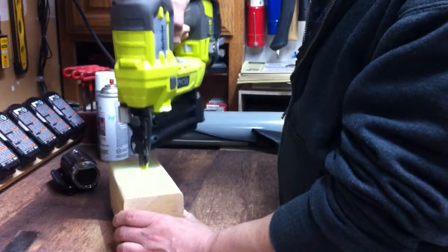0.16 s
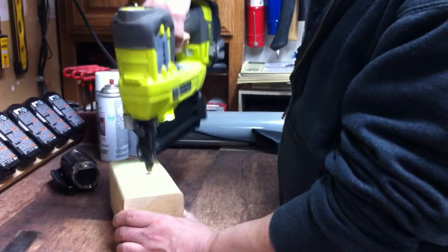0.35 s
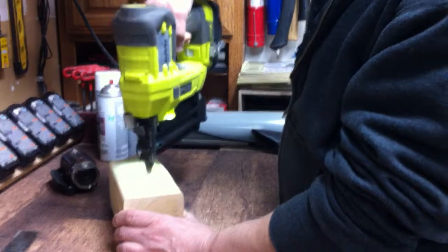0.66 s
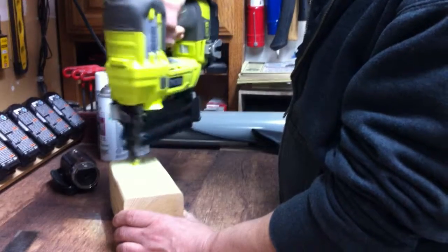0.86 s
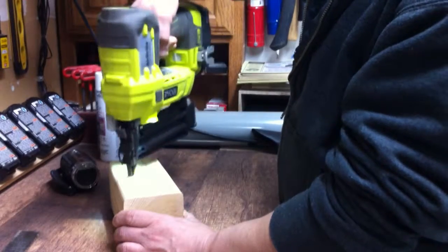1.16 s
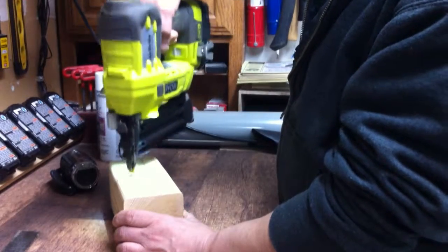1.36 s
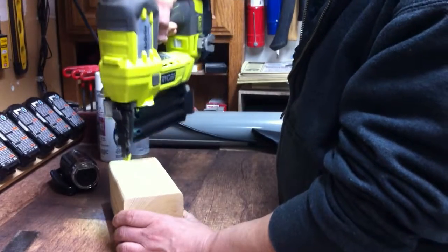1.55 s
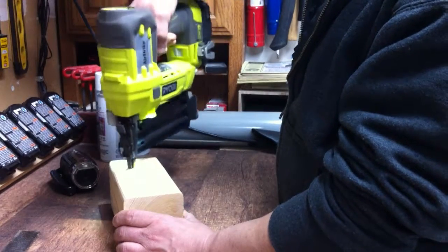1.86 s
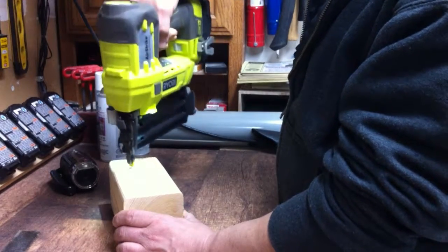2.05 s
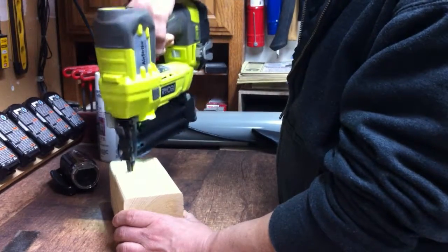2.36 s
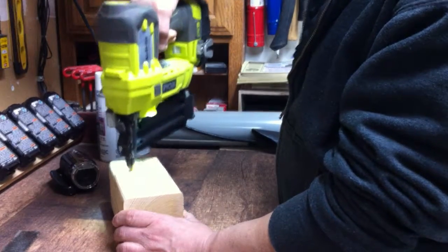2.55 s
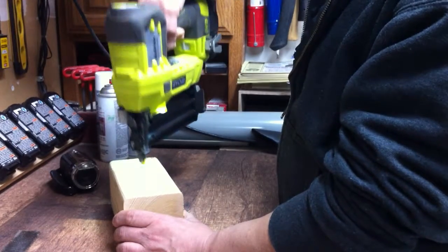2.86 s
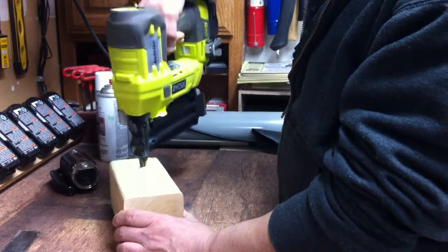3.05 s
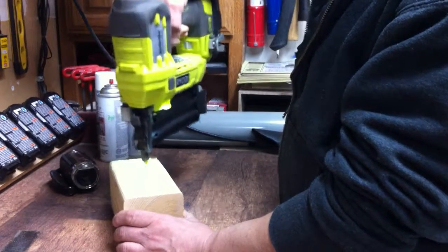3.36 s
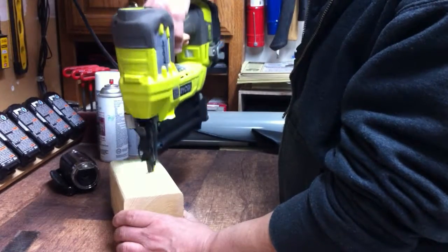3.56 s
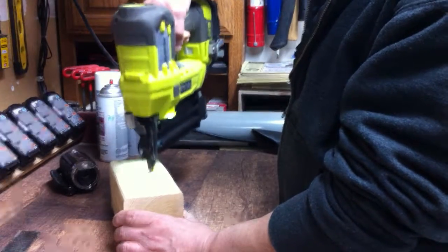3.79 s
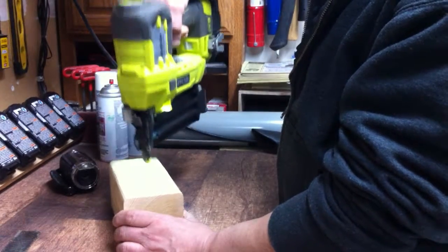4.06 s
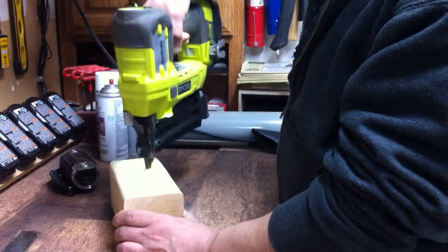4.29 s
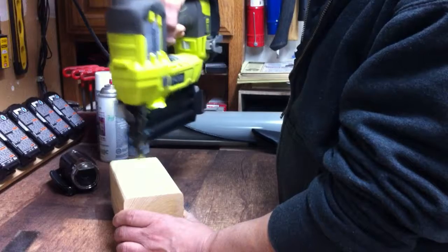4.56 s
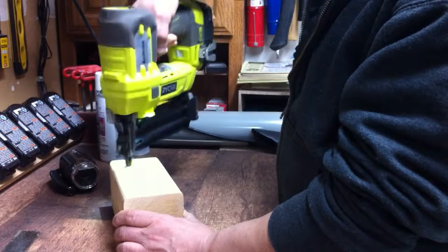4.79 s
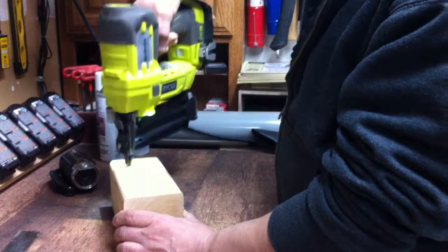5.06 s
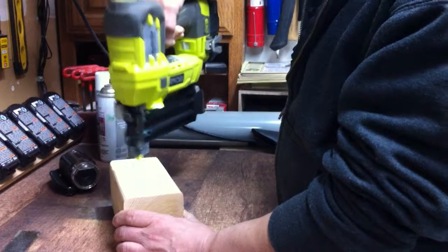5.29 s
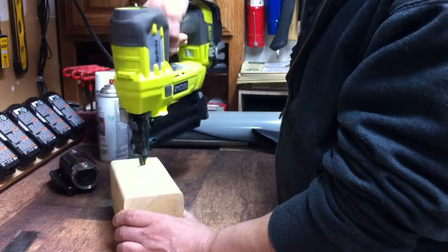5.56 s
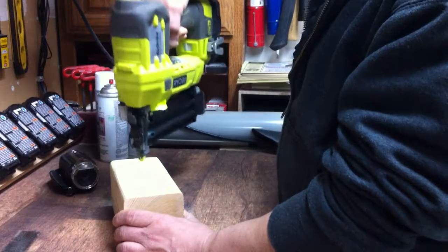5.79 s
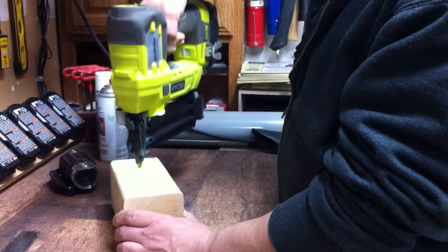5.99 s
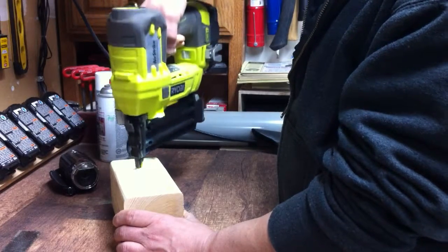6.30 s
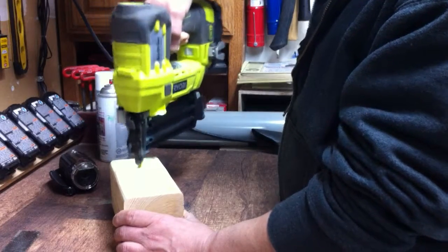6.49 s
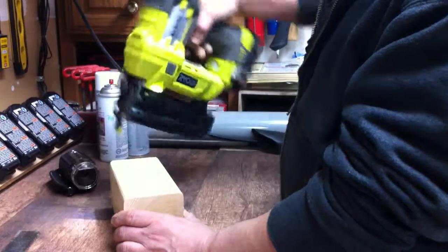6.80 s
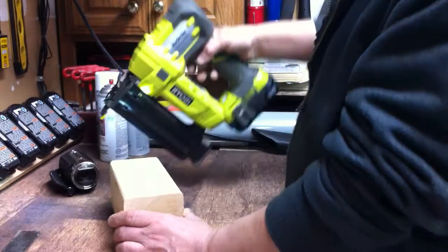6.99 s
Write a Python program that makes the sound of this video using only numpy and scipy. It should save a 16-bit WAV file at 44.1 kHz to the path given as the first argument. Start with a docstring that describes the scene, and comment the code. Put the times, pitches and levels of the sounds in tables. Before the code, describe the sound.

Close, dry and loud: repeated shots from an electric brad nailer on solid wood. A brief grinding gear whine climbs before every sharp bang; about a seventh of a second later comes a bright metal snap-back, then the motor stops abruptly. Small clicks and soft bumps of the tool on the block fill the gaps. The last shot follows a slightly longer pause, in a small room with very quiet air.

```python
"""A cordless brad nailer fires eleven nails into a wooden block on a workbench, in a small workshop.
Before each shot a geared motor winds up and sags against the compressed air; the driver slams the nail home,
about .14 s later it snaps back with a metallic ring, and .21 s after the shot the motor is braked.
Before most nails the nose clicks down on the wood. Hits are filtered noise and decaying modes.
Near surfaces answer within 21 ms, and the workshop's short tail and steady air noise lie behind."""
import sys
import numpy as np
from scipy import signal
from scipy.io import wavfile
from scipy.ndimage import uniform_filter1d

SR = 44100
rng = np.random.default_rng(int(sys.argv[2]) if len(sys.argv) > 2 else 0)


def transcribe(signal):
    """Save signal, clipped to [-1, 1], as a 16-bit WAV file at the path in sys.argv[1]."""
    frames = np.atleast_2d(signal).T
    limited = np.clip(frames, -1, 1)
    pcm = np.round(limited * 32767).astype(np.int16)
    wavfile.write(sys.argv[1], SR, pcm)


N = 314871  # samples in the scene
HIT_SIZE = 13230  # samples in one hit (0.3 s)


def amp(db):
    """Converts decibels to an amplitude factor."""
    return 10 ** (np.asarray(db) / 20)


def evened(x):
    """Scales a sound to rms 1."""
    return x / np.sqrt(np.mean(x ** 2) + 1e-20)


def as_hit(x):
    """Scales a hit to the energy of 20 ms at rms 1."""
    return x * np.sqrt(.02 * SR / np.sum(x ** 2))


def read(points, hz):
    """Interpolates a table of (hz, value) along log frequency."""
    f, value = np.transpose(points)
    return np.interp(np.log(hz + 1), np.log(f + 1), value)


def add(mix, s, sound):
    """Adds a sound at s seconds; whatever falls outside the scene is cut off."""
    start = round(s * SR)
    part = mix[max(start, 0):][:len(sound) + min(start, 0)]
    part += sound[max(-start, 0):][:len(part)]


def colour(x, spectrum):
    """Causal, minimum-phase filter with the given spectrum."""
    hz = abs(np.fft.fftfreq(4096, 1 / SR))
    log_gain = np.log(amp(read(spectrum, hz)))
    taps = np.fft.ifft(np.exp(np.conj(signal.hilbert(log_gain)))).real
    return signal.oaconvolve(x, taps[:len(taps) // 2])[:len(x)]


def chatter(rise, hold, t60, habit=0, alike=0):
    """Dense contact noise that swells, holds and dies; the share alike repeats the mechanism's habit."""
    t = np.arange(HIT_SIZE) / SR
    noise = np.sqrt(alike) * habit + np.sqrt(1 - alike) * rng.standard_normal(HIT_SIZE)
    decay = amp(-60 * np.maximum(t - hold, 0) / t60)
    return noise * (1 - np.exp(-t / rise)) * decay


def ring(modes, rise, detune, scatter_db):
    """Decaying modes with soft onset, each shifted a little in pitch and level at every blow."""
    t = np.arange(HIT_SIZE) / SR
    hz, db, t60 = np.transpose(modes)[:, :, None]
    shift, gain = rng.standard_normal((2, len(modes), 1))
    sign = (-1) ** np.arange(len(modes))[:, None]
    decay = amp(db + scatter_db * gain - 60 * t / t60)
    waves = sign * decay * np.sin(2 * np.pi * hz * (1 + detune * shift) * t)
    return as_hit(waves.sum(0) * (1 - np.exp(-t / rise)))


# the nails, one row each; the gains shape the tone around 700, 2800 and 7000 Hz:
# start_s, wood_db, crack_db, treble_db
NAIL_SHOTS = [(0.0636, -5, -3.5, -3.5), (0.7286, -6, -2, -2), (1.3584, -3, -2.5, -2.2),
              (2.032, -3.5, -2, 1), (2.6421, -2.5, -1, -0.2), (3.266, -1.7, -2, 1.5),
              (3.8618, -1.5, 1, -0.5), (4.4953, -2.5, -0.5, 1), (5.1231, -4, -2.6, -0.6),
              (5.7387, -4, 0, 0.5), (6.5009, -3, -1, 1)]
# spectrum of the crack: pitch_hz, level_db (per Hz)
CRACK_SPECTRUM = [(30, -32), (90, -28), (300, -9), (650, -7.5), (1100, -5), (1650, -6), (2200, 5),
                  (2900, -3.5), (4300, 2.5), (5600, -5), (6500, 0.5), (8500, -12), (10500, -14.5),
                  (15500, -10.5)]
# spectrum of the recoil's single push on the block: pitch_hz, level_db (per Hz)
RECOIL_SPECTRUM = [(30, -10), (90, -7), (300, 1.5), (700, -5.5), (2000, -21.5)]
# the wooden block on the bench: pitch_hz, level_db, t60_s
WOOD_BLOCK_MODES = [(177, -20, 0.13), (307, -10, 0.16), (420, -5, 0.1), (500.3, -7, 0.17),
                    (649, -15, 0.051), (712, -8, 0.14), (832, -6.5, 0.11), (930, -8, 0.036),
                    (980, -1, 0.11), (1054, 1, 0.085), (1180, 3, 0.11), (1315, 3.5, .08), (1525, -1, 0.041)]
# the nailer's nose and housing: pitch_hz, level_db, t60_s
NOSE_HOUSING_MODES = [(2034, -4, 0.074), (2170, -15, 0.043), (2566, -1.5, 0.063), (2497, -5.5, 0.053),
                      (3237, -3, 0.049), (3402, 4, 0.021), (3901, -1, 0.045), (4260, -1.5, 0.027),
                      (4940, -1, 0.02), (4940, 2, 0.047), (5232, 2, 0.035), (6400, -8, 0.012),
                      (6230, 4.5, 0.028), (6415, -11.5, 0.019), (7070, -4, 0.049), (7680, -8, 0.057),
                      (7840, -2.5, 0.033)]
# spectrum of spitting air and hissing brushes: pitch_hz, level_db (per Hz)
HISS_SPECTRUM = [(100, -30), (1500, -2), (5000, 0), (8000, 2), (10500, -0.5), (13000, 1.5), (15000, -2),
                 (16000, -5)]


def shots():
    """Air spits, the driver cracks the nail into the wood, and the recoiling tool settles and rattles twice."""
    out = np.zeros(N)
    for s, wood_db, crack_db, treble_db in NAIL_SHOTS:
        crack = as_hit(colour(chatter(rise=.00025, hold=.0045, t60=.05), CRACK_SPECTRUM))
        block = ring(WOOD_BLOCK_MODES, rise=.0016, detune=.006, scatter_db=1.8)
        housing = ring(NOSE_HOUSING_MODES, rise=.00062, detune=.006, scatter_db=3.0)
        push = as_hit(colour(signal.unit_impulse(HIT_SIZE), RECOIL_SPECTRUM))
        blow = amp(-18.0) * crack + amp(-33.0) * block + amp(-22.0) * housing + amp(-46.0) * push
        tone = [(700, wood_db), (2800, crack_db), (7000, treble_db)]
        add(out, s, colour(blow, tone))

        spit = as_hit(colour(chatter(rise=.0022, hold=.0025, t60=.014), HISS_SPECTRUM))
        add(out, s - .0034, amp(-31.5) * spit)

        late = rng.standard_normal(2)
        add(out, s + .0515 + .00087 * late[0], amp(-33.5) * rattle(t60=.055))
        add(out, s + .078 + .002 * late[1], amp(-43.5) * rattle(t60=.059))
    return out


# the driver snaps back against its stop: start_s, ring_db, clack_db
DRIVER_RETURNS = [(0.205, -24.5, -23), (0.8714, -20.5, -21.5), (1.498, -20.5, -22.5), (2.1737, -17, -21.5),
                  (2.7831, -18, -21), (3.4055, -17.5, -20), (3.999, -18, -20.5), (4.634, -17, -20.5),
                  (5.2644, -17.5, -22.5), (5.8774, -18, -20.5), (6.6437, -19, -21.5)]
# modes of the cylinder and driver: pitch_hz, level_db, t60_s
CYLINDER_DRIVER_MODES = [(303, -38.5, 0.12), (400.7, -22, 0.071), (432.4, -32, 0.087), (479, -42, 0.26),
                         (896, -33.5, .08), (1166, -29, 0.08), (1475, -19, 0.039), (1661, -9.5, 0.042),
                         (1765, -9.5, 0.05), (1877, -3, .052), (1995, 9.5, 0.031), (2150, -14, 0.087),
                         (2800, -20.5, 0.011), (3670, -29.5, 0.04)]
# spectrum of the clack on the stop: pitch_hz, level_db (per Hz)
CLACK_SPECTRUM = [(30, -28.5), (110, -33), (250, -37), (420, -2.5), (850, -19), (1250, -14.5), (1950, 5.5),
                  (2500, 1.5), (3500, 2.5), (5000, -4.5), (7300, -5.5), (8800, -12.5), (11000, -17),
                  (13500, -14.5), (16000, -14.5)]
RING_ROUGH = .28  # how much the driver's chatter on its stop roughens the ring (0-1)


def returns():
    """The driver scrapes up the cylinder, hits its stop and rings as it chatters there."""
    out = np.zeros(N)
    habit = rng.standard_normal(HIT_SIZE)  # the part of the clack that every return shares
    for s, ring_db, clack_db in DRIVER_RETURNS:
        scrape = as_hit(colour(chatter(rise=.0005, hold=.0035, t60=.015), GRIND_SPECTRUM))
        contact_noise = chatter(rise=.00016, hold=.00056, t60=.066, habit=habit, alike=.8)
        clack = as_hit(colour(contact_noise, CLACK_SPECTRUM))
        contact = 1 + RING_ROUGH * evened(uniform_filter1d(rng.standard_normal(HIT_SIZE), size=110))
        modes = ring(CYLINDER_DRIVER_MODES, rise=.0033, detune=.011, scatter_db=2.1)
        ringing = as_hit(contact * modes)
        add(out, s - .005, amp(clack_db) * amp(-13.0) * scrape)
        add(out, s, amp(clack_db) * clack)
        add(out, s + .00052, amp(ring_db) * ringing)
    return out


# the motor starts before each shot, runs on after it, and the brake slows it with this time constant (s)
WIND_UP_S, RUN_ON_S, BRAKE_S = .214, .21, .014
# time constant of the spin-up (s), share of the speed lost at full pressure
SPIN_UP_S, SAG = .036, .29
# widths of the pressure's bell-shaped rise before the shot and fall after it (s)
SQUEEZE_S, RELEASE_S = .032, .015


def motor_cycle():
    """Time from the shot (s), speed, air pressure and the piston's travel (all 0-1) through one cycle."""
    t = np.arange(-WIND_UP_S, RUN_ON_S + 5 * BRAKE_S, 1 / SR)
    pressure = np.exp(-(t / np.where(t < 0, SQUEEZE_S, RELEASE_S)) ** 2)
    spin_up = 1 - np.exp(-(t + WIND_UP_S) / SPIN_UP_S)
    brake = np.exp(-np.maximum(t - RUN_ON_S, 0) / BRAKE_S)
    pace = spin_up * (1 - SAG * pressure) * brake
    travel = np.minimum(1 + t / WIND_UP_S, 1)
    return t, pace, pressure, travel


# gear whine partials: multiple of the mesh rate, level_db
WHINE_PARTIALS = [(.99, -2), (1.37, -8), (2.02, 0), (3.03, -8)]
# spectrum of grinding and scraping metal: pitch_hz, level_db (per Hz)
GRIND_SPECTRUM = [(60, -37), (200, -25.5), (600, -14), (1100, -12), (1600, -1), (2400, -1), (3200, 0.5),
                  (4200, 4), (6000, -2), (7800, -4), (10000, -22.5), (16000, -32)]
# levels of grind, hiss and whine, before the speed scales them:
# stroke_end_db, gained_along_stroke_db, change_just_before_shot_db, running_on_db
GRIND_LEVELS = (-38, 17, -4.5, -45.5)
HISS_LEVELS = (-44.5, 12.5, -15, -51)
WHINE_LEVELS = (-46, 9.5, 15, -56.5)
MESH_HZ = 2950  # gear mesh rate at full speed, before each cycle's random deviation
BRAKE_DB, STRAIN_S = 2, .033  # the brake strains the gears: extra grind and its width in time
GRIP_T60 = .06  # extra damping by the hand's pressure (s)


def motor_level(levels, t, pressure, travel):
    """Level in dB that climbs along the stroke, swells or dips just before the shot and is steady after it."""
    top, climb, change, run_on = levels
    return np.where(t < 0, top - climb * (1 - travel) + change * pressure, run_on)


def motor():
    """Gears grind louder along the stroke and brush hiss climbs; the hiss level dips briefly just before the
    shot; the whine sags."""
    t, pace, pressure, travel = motor_cycle()
    grind_db = motor_level(GRIND_LEVELS, t, pressure, travel)
    grind_db = grind_db + BRAKE_DB * np.exp(-((t - RUN_ON_S) / STRAIN_S) ** 2)
    hiss_db = motor_level(HISS_LEVELS, t, pressure, travel)
    whine_db = motor_level(WHINE_LEVELS, t, pressure, travel)
    out = np.zeros(N)
    for s, *_ in NAIL_SHOTS:
        teeth, brushes, wobble, lumps = rng.standard_normal((4, SR))[:, :len(t)]
        speed = 1 + .014 * rng.standard_normal() + .026 * evened(uniform_filter1d(wobble, size=40))
        turns = np.cumsum(MESH_HZ * pace * speed) / SR

        # backlash breaks up each partial
        backlash = uniform_filter1d(rng.standard_normal((len(WHINE_PARTIALS), SR)), size=110)[:, :len(t)]
        whine = np.zeros(len(t))
        for (multiple, db), play in zip(WHINE_PARTIALS, backlash):
            whine += amp(db) * (1 + evened(play)) * np.sin(2 * np.pi * multiple * turns)

        teeth = teeth * amp(2.0 * evened(uniform_filter1d(lumps, size=60)))  # the teeth catch unevenly
        grind = amp(1.33) * evened(colour(teeth, GRIND_SPECTRUM))
        # they shake the housing and the block under it; pressed down, both ring shorter
        for modes, db in (NOSE_HOUSING_MODES, -7.5), (WOOD_BLOCK_MODES, -16.0):
            body = ring(modes, rise=.0012, detune=.027, scatter_db=3.5)
            body = body * amp(-60 * np.arange(HIT_SIZE) / SR / GRIP_T60)
            grind = grind + amp(db) * evened(signal.fftconvolve(teeth, body)[:len(t)])

        hiss = evened(colour(brushes, HISS_SPECTRUM))
        sound = amp(grind_db) * grind + amp(hiss_db) * hiss + amp(whine_db) * evened(whine)
        add(out, s - WIND_UP_S, pace * sound)
    return out


# levels of the starting jolt and of the gears' tick (dB), delay of the tick (s)
JOLT_DB, MESH_CLICK_DB, SLACK_S = -62, -56, .015


def motor_start():
    """The motor's torque jolts the tool, and the gears take up their slack with a tick."""
    out = np.zeros(N)
    for s, *_ in NAIL_SHOTS:
        add(out, s - WIND_UP_S, amp(JOLT_DB) * thud())
        add(out, s - WIND_UP_S + SLACK_S, amp(MESH_CLICK_DB) * rattle(t60=.05))
    return out


# the safety nose clicks down on the wood and slides in against its spring; the last two clicks are
# its release, with hardly any slide: start_s, click_db, treble_db (gain at 8 kHz), slide_db
NOSE_CONTACTS = [(0.478, -41.5, -3, -51), (1.104, -42, -7, -52), (1.7754, -44.5, -10.5, -57),
                 (2.3844, -42, -11.5, -55), (3.0018, -45.5, -4.5, -55.5), (3.5923, -43, -9, -59.5),
                 (4.2309, -42, -7.5, -52.5), (4.863, -43.5, -8.5, -55), (5.4604, -46, -12.5, -66),
                 (6.098, -47, -10, -72.5), (6.1245, -51.5, -5.5, -65)]
# the tool's weight bumps the block and the bench: start_s, level_db
WEIGHT_BUMPS = [(0.492, -51), (1.123, -46.5), (1.802, -53.5), (2.412, -53), (3.042, -61.5), (3.632, -64),
                (4.264, -59), (4.896, -56)]
# the bench top: pitch_hz, level_db, t60_s
BENCH_TOP_MODES = [(86, -5, 0.32), (121.2, 0, 0.18), (176, 0, 0.17)]


def handling():
    """The nose clicks and slides, at last clicks free; the tool's weight thuds through block and bench."""
    out = np.zeros(N)
    for s, click_db, treble_db, slide_db in NOSE_CONTACTS:
        click = colour(rattle(t60=.06), [(2500, .0044), (8000, treble_db)])
        add(out, s, amp(click_db) * click)
        slide = as_hit(colour(chatter(rise=.018, hold=.055, t60=.12), GRIND_SPECTRUM))
        add(out, s, amp(slide_db) * slide)
    for s, db in WEIGHT_BUMPS:
        add(out, s, amp(db) * thud())
        boom = ring(BENCH_TOP_MODES, rise=.013, detune=.06, scatter_db=2)
        add(out, s + .02, amp(db) * amp(-14.0) * boom)
    return out


# spectrum of a light click: pitch_hz, level_db (per Hz)
CLICK_SPECTRUM = [(100, -20.5), (700, -14.5), (1500, -7), (2200, 3.5), (3500, -4.5), (6000, 0),
                  (9000, -8.5), (15000, -17)]


def rattle(t60):
    """A light click of steel parts inside the plastic housing, which rings with it."""
    click = as_hit(colour(chatter(rise=.00012, hold=.00086, t60=t60), CLICK_SPECTRUM))
    housing = ring(NOSE_HOUSING_MODES, rise=.00022, detune=.015, scatter_db=7.0)
    return as_hit(click + amp(-7.0) * housing)


# spectrum of a soft knock: pitch_hz, level_db (per Hz)
KNOCK_SPECTRUM = [(30, -13.5), (85, -13.5), (170, 7.5), (320, 5.5), (600, 3), (1200, -2.5), (2500, -15),
                  (8000, -32.5)]


def thud():
    """A soft, stuttering push of the tool on the block, which rings with it."""
    push = as_hit(colour(chatter(rise=.004, hold=.01, t60=.087), KNOCK_SPECTRUM))
    block = ring(WOOD_BLOCK_MODES, rise=.004, detune=.025, scatter_db=1.0)
    return as_hit(push + amp(-6.5) * block)


# first echoes from bench, pegboard and cabinets: delay_s, level_db
NEAR_ECHOES = [(.0034, -28.5), (.0062, -23.5), (0.0118, -30), (0.016, -31), (0.021, -40)]


def near_field(tool):
    """The direct sound and its first echoes, whose paths are some 1 to 7 m longer."""
    near = tool.copy()
    for delay, db in NEAR_ECHOES:
        add(near, delay, amp(db) * tool)
    return near


# the workshop's decay: pitch_hz, t60_s
WORKSHOP_DECAY = [(100, 0.243), (400, 0.23), (1000, 0.29), (2000, 0.35), (4000, 0.35), (8000, 0.29),
                  (15000, 0.24)]


def workshop(x):
    """Sparse reflections of random sign; each band dies at its own speed."""
    slots = np.arange(200, SR // 2, 20)  # one reflection in every 20 samples
    taps = np.zeros(SR)
    taps[slots + rng.integers(0, 20, len(slots))] = rng.choice([-1., 1.], len(slots))
    hz, t, z = signal.stft(taps, SR, nperseg=256)
    decay = amp(-60 * t / read(WORKSHOP_DECAY, hz)[:, None])
    tail = signal.istft(z * decay, SR, nperseg=256)[1]
    return signal.fftconvolve(x, tail / np.linalg.norm(tail))[:N]


# spectrum of the steady background air: pitch_hz, level_db (per Hz)
AIR_SPECTRUM = [(25, -28), (65, -34.5), (110, -17), (180, -3), (320, -6), (600, -8), (1500, -11.5),
                (5000, -16.5), (10000, -20.5), (16000, -22.5)]


def air():
    """Steady filtered noise: the quiet air of the workshop."""
    return amp(-69) * evened(colour(rng.standard_normal(N), AIR_SPECTRUM))


def scene():
    """Near surfaces answer first; as the tool shifts along, the tail glides between two sets of reflections."""
    tool = shots() + returns() + motor() + motor_start() + handling()
    place = 2 * np.pi * np.arange(N) / N
    tail = workshop(tool * np.cos(place)) + workshop(tool * np.sin(place))
    tail_spectrum = [(60, -18.0), (200, -16.5), (900, -10.0), (1650, -11.5), (2000, -16.5),
                     (2400, -11.5), (3000, -13.5), (5000, -13.0), (14000, -11.0)]
    return (near_field(tool) + colour(tail, tail_spectrum) + air())[None]


EDGE_HZ = 15900  # upper band limit


def record(dry):
    """The microphone channel rounds off the loudest peaks, then limits the band."""
    rounded = np.tanh(dry)
    low_pass = signal.firwin(511, EDGE_HZ, window=("kaiser", 9), fs=SR)
    return signal.oaconvolve(rounded, low_pass[None], "same")


dry = scene()
out = record(dry)
transcribe(out)
```